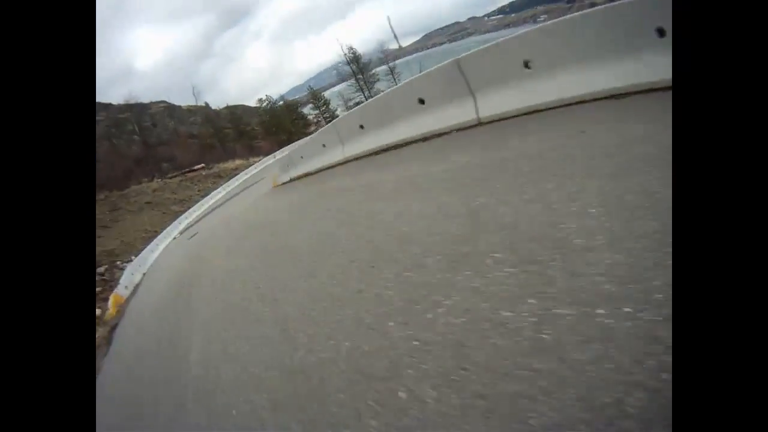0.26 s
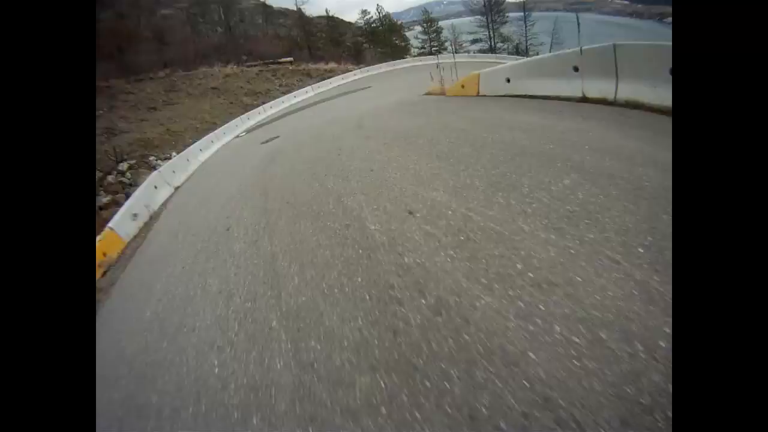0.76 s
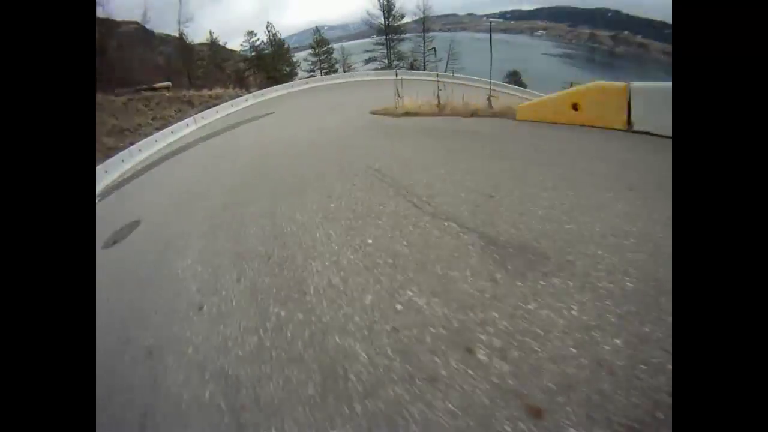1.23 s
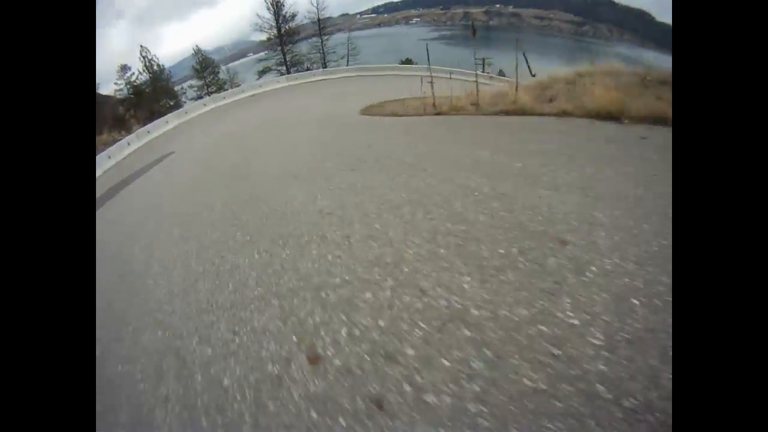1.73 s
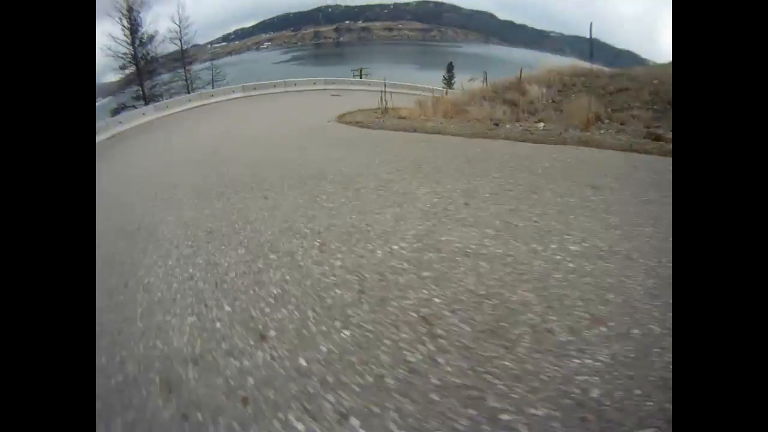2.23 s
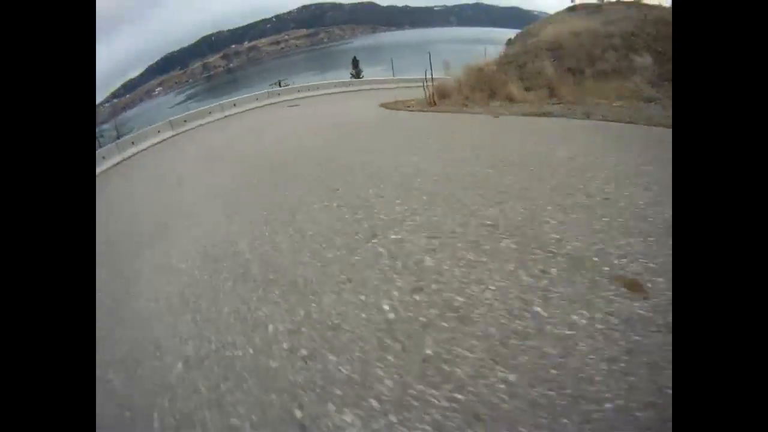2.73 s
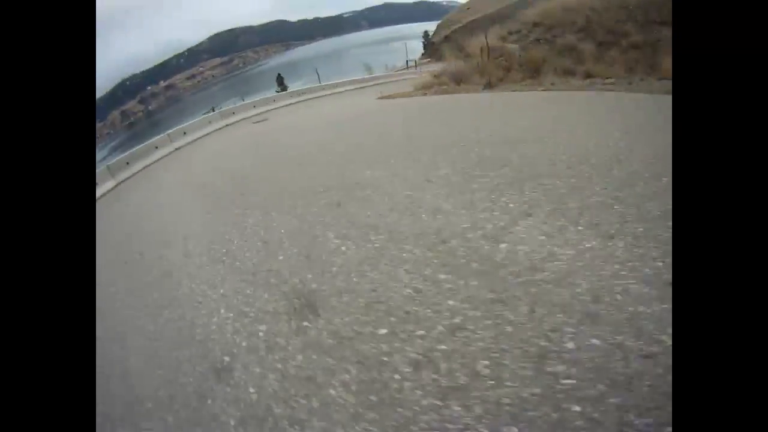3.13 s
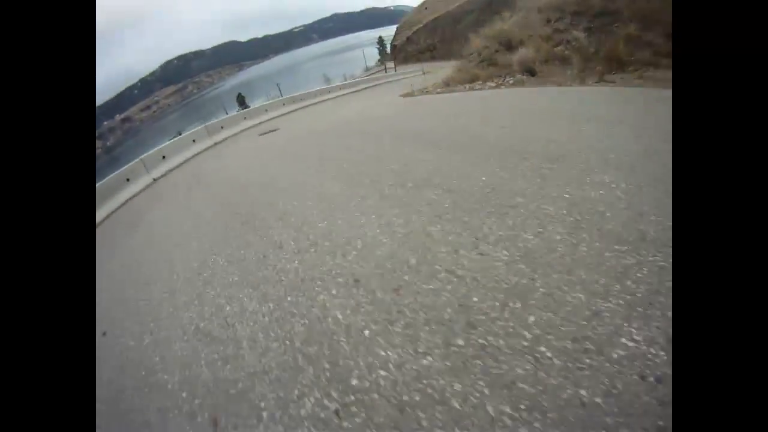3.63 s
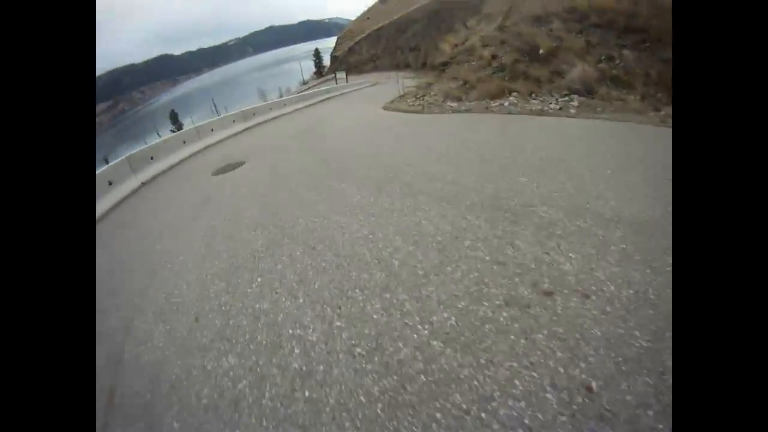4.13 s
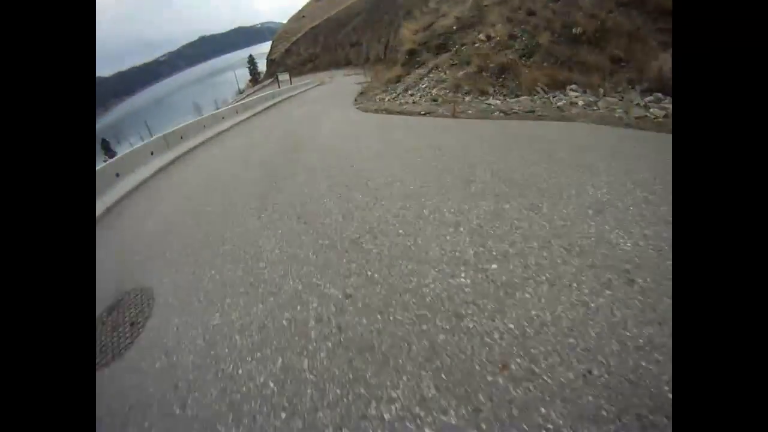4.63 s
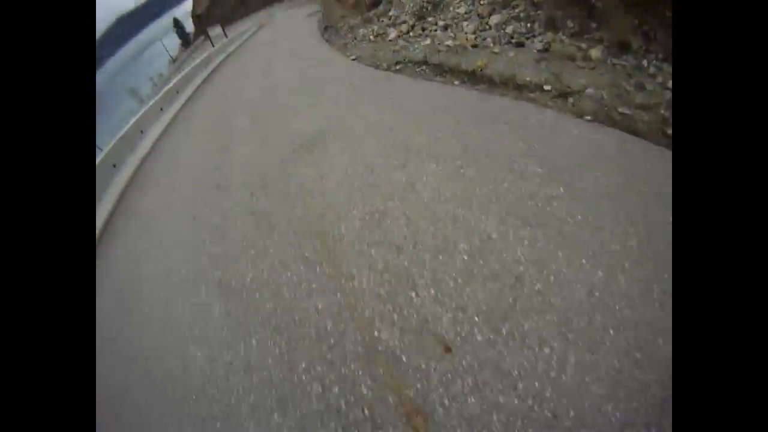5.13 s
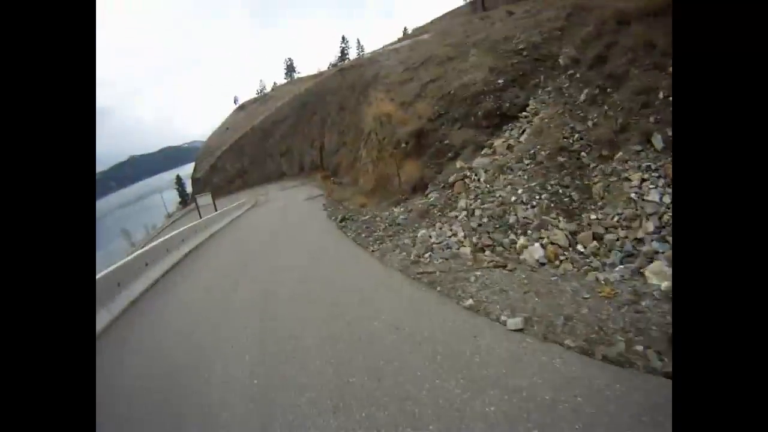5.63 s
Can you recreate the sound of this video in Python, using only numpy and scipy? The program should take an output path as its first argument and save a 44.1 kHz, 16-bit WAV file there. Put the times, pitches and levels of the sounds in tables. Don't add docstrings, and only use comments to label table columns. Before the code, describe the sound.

A loud, nasal, gritty plastic drag on rough road swells and stutters, stops, rasps again for half a second, leaving soft wheel roar and wind rumble.

```python
import sys
import numpy as np
from scipy import signal
from scipy.fft import rfft, irfft, next_fast_len
from scipy.io import wavfile
from scipy.ndimage import uniform_filter1d

SR = 44100
rng = np.random.default_rng(int(sys.argv[2]) if len(sys.argv) > 2 else 0)


def elevation(decibels):
    levels = np.asarray(decibels, float)
    return 10 ** (levels / 20)


def bounce(signal):
    frames = np.transpose(np.atleast_2d(signal))
    limited = np.clip(frames, -1, 1)
    pcm = np.round(limited * 32767).astype(np.int16)
    wavfile.write(sys.argv[1], SR, pcm)


N = 258867

# start_s, unevenness (0-1), extra_low_ring_db
CONTACT = [
    (0, 0, 2),
    (.5, 0.33, -2.5),
    (1.5, 0.71, -2),
    (2.4, 0.18, -2.5),
    (3.3, 0, -4),
    (4.0, .7, 0),
    (4.36, 0.34, 0.5),
    (4.85, 0.43, 1),
    (5.2, 1, 5.5),
    (5.3, 0.7, -4),
]


def unit(x):
    return x / np.sqrt(np.mean(x ** 2))


def columns(table):
    s, *values = np.transpose(table)
    return [np.interp(np.arange(N) / SR, s, v) for v in values]


def humps(table):
    t = np.arange(N) / SR
    return sum(db * np.exp(-(2 * (t - s) / length) ** 2) for s, db, length in table)


def band_pass(x, order, edges):
    return signal.sosfilt(signal.butter(order, edges, "band", fs=SR, output="sos"), x)


def ring(x, hz, width):
    return signal.lfilter(*signal.iirpeak(float(hz), hz / width, fs=SR), x)


def walk(rate):
    k = max(int(SR / rate), 1)
    held = np.repeat(rng.standard_normal(N // k + 1), k)
    return unit(uniform_filter1d(uniform_filter1d(held, k), k)[:N])


def colour(x, gain):
    size = next_fast_len(N + 4096)
    hz = np.arange(size // 2 + 1) * SR / size
    return irfft(rfft(x, size) * gain(hz), size)[:N]


def contact():
    # start_s, pressure_db, lean_db, bite_db
    long_drag = [(0, -31.5, -3, -0.5), (.31, -33.5, -4.5, 7.5), (.52, -30.5, -1, 0.5), (.58, -24.5, -2, -2),
                 (.74, -21, 4, 2), (1.0, -23, 3, 2.5), (1.3, -22, 3.5, 7), (1.5, -16.5, 0, -4.5),
                 (1.62, -19.5, -2, -2.5), (1.85, -21, -1, -1.5), (2.15, -20.5, -2, 3),
                 (2.5, -19.5, -1.5, -3.5), (2.62, -22.5, -2, 9.5), (3.2, -26, -1, -5),
                 (3.62, -27.5, -0.5, -6.5), (3.78, -25, 4, -1), (3.9, -28.5, 5.5, 1.5),
                 (3.99, -38.5, 4.5, -6)]
    # start_s, pressure_db, lean_db, bite_db
    short_drag = [
        (4.353, -29, 4, 10),
        (4.385, -21.5, 5.5, -8),
        (4.47, -20, 5, 0),
        (4.7, -24, 5, -0.5),
        (4.79, -24.5, 4, -6),
        (4.826, -30, 7.5, -14),
        (4.87, -46.5, -2, -9),
    ]
    # start_s, pressure_db, dullness_db
    brush = [
        (4.0, -52, -3),
        (4.2, -50.5, -6.5),
        (4.35, -43, -7),
        (4.87, -42, -8),
        (5.05, -54.5, 0),
        (5.25, -54, -7),
        (5.4, -59, -23),
        (5.87, -55.5, -1),
    ]
    # centre_s, change_db, length_s
    dips_and_swells = [(.374, 1.5, 0.097), (.499, -1.5, 0.092), (.818, -5, 0.051), (.883, -12, 0.021),
                       (.708, 5, 0.021), (1.39, -1.5, 0.035), (3.801, 2, .08), (.856, -5.5, 0.016),
                       (3.862, -0.5, .025), (1.15, 0.5, 0.099), (3.7, 1.5, .08), (.912, 4, 0.018),
                       (1.03, -7.5, 0.073), (1.197, -2.5, 0.014), (1.457, -9, 0.15), (1.791, -1.5, 0.14),
                       (1.931, -1, 0.029), (2.165, 2.5, 0.11), (2.235, -3.5, 0.033), (2.345, 1, .06),
                       (2.514, 2, 0.033), (2.569, -5, 0.032), (2.814, 5, 0.032), (2.844, -5, 0.027),
                       (3.407, -4, 0.049), (3.612, -1, 0.033), (3.946, -8.5, 0.025), (4.131, 8, 0.032),
                       (5.213, 0, .03), (5.32, 3, 0.025)]
    let_go_s = .006

    t = np.arange(N) / SR
    second = t > brush[0][0]
    down = (t < long_drag[-1][0]) | ((t > short_drag[0][0]) & (t < short_drag[-1][0]))
    down = uniform_filter1d(1. * down, size=int(let_go_s * SR) + 1)
    pressure_db, lean_db, bite_db = down * np.where(second, columns(short_drag), columns(long_drag))
    brush_db, dull_db = (1 - down) * columns(brush)
    return pressure_db + brush_db + humps(dips_and_swells), lean_db, bite_db, dull_db, 1 - down


def grit(rate, spread_db, patchy_db):
    uneven = columns(CONTACT)[0]
    hit = rng.random(N) < rate / SR
    size_db = uneven * spread_db * np.minimum(rng.exponential(size=N), 5)
    clicks = hit * elevation(size_db) * rng.standard_normal(N)
    clicks = clicks * elevation(uneven * patchy_db * walk(140))
    return clicks / np.sqrt(uniform_filter1d(clicks ** 2, size=SR // 12) + 1e-9)


def knocks(pressure_db, lean_db):
    # start_s, peak_db, pitch_hz
    stones = [(0.5611, -7, 2270), (0.6195, -8, 2150), (0.6978, -6, 2890), (0.7467, -3, 2800),
              (0.7756, -2.5, 2390), (0.8964, -3, 2800), (0.9068, -3, 2200), (0.9692, 0, 2280),
              (1.1238, -2, 2510), (1.2441, -9, 2140), (1.3204, -2.5, 2320), (1.5189, 1, 2930),
              (1.5274, 0.5, 2150), (1.5978, -3.5, 2300), (1.6162, -3.5, 2130), (1.8627, -1.5, 2240),
              (1.8891, -2, 2160), (1.9644, -0.5, 2130), (2.0542, -4, 2200), (2.135, 0, 2320),
              (2.2543, -3, 2250), (2.387, 3, 2150), (2.4164, 3.5, 2340), (2.4683, 0.5, 2200),
              (2.5107, 3, 2200), (2.8045, -5, 2300), (3.044, -4.5, 2340), (4.122, -22.5, 2040),
              (4.361, -3, 2960), (5.221, -21, 1970)]
    pebbles_per_s, pebble_db, pebble_spread_db, pebble_hz = 16, 13.5, -4.5, 2200
    puff_db, puff_spread_db, puff_per_lean = -14, 3.5, -1.15

    tick = np.arange(300) / SR
    swell = np.minimum(tick / .0005, 1) * np.exp(-(tick / .003) ** 2)
    luck = rng.standard_normal((200, 303))
    times = np.cumsum(rng.exponential(size=170)) / pebbles_per_s
    pebbles = []
    for s, chance in zip(times[times < N / SR], luck[len(stones):]):
        peak_db = pressure_db[int(s * SR)] + pebble_db + pebble_spread_db * np.tanh(chance[301])
        pebbles.append((s, peak_db, pebble_hz * (1 + 0.044 * chance[302])))

    chatter, bright = np.zeros(N + 300), np.zeros(N + 300)
    for (s, db, hz), puff in zip(list(stones) + pebbles, luck):
        at = slice(int(s * SR), int(s * SR) + 300)
        chatter[at] += elevation(db - 7.0) * swell * np.sin(2 * np.pi * hz * tick + 3 * puff[0])
        bright[at] += elevation(db + puff_db + puff_spread_db * np.tanh(puff[300])) * swell * puff[:300]
    return chatter[:N], bright[:N] * elevation(puff_per_lean * lean_db)


def shell(push, modes, edges):
    return band_pass(sum(elevation(db) * ring(push, hz, width) for hz, width, db in modes), 3, edges)


def drag():
    # centre_hz, width_hz, level_db
    low_modes = [(1200, 140, 0), (1340, 130, 5), (1575, 75, 0)]
    main_modes = [(1870, 100, -21.5), (2150, 220, 4.5), (2418, 70, -2)]
    middle_modes = [(2800, 660, 3), (2813, 173, 22)]
    edge_modes = [(3526, 610, -2.8), (3562, 130, 1)]
    upper_modes = [(3850, 405, 9), (4250, 570, -23), (4760, 330, 4.5), (5230, 180, -1)]
    # from_hz, to_hz
    passes = [(1080, 1630), (1650, 2940), (2400, 3156), (3150, 3560), (3700, 10700)]
    wander_db = 2.5

    main_db, lean_db, bite_db, dull_db, away = contact()
    middle_db = -8 + lean_db + 0.51 * dull_db + wander_db * walk(12)
    edge_db = -10.5 + bite_db + dull_db + wander_db * walk(10)
    upper_db = -12.5 - 1.13 * lean_db + 0.84 * dull_db + 4 * away + 1.15 * wander_db * walk(14)
    low_db = -14 - 0.39 * (main_db + 19) + columns(CONTACT)[1] - 2 * away

    shared = grit(rate=1800, spread_db=2.8, patchy_db=3.6)
    out, bright = knocks(main_db, lean_db)
    lifted = 1 / (1 + 11.0 * uniform_filter1d(np.abs(out), size=200))
    # modes, level dB, share of own grain, puff level dB
    groups = ((low_modes, low_db, .8, -15),
              (main_modes, -1.5, .3, -15),
              (middle_modes, middle_db + 0.21, .6, -8),
              (edge_modes, edge_db + 0.84, .9, 2.5),
              (upper_modes, upper_db + 0.38, .7, -3))
    for (modes, db, own, puff_db), edges in zip(groups, passes):
        push = shared + own * grit(rate=1500, spread_db=-1.0, patchy_db=4.0)
        scale = np.sqrt(np.mean(shell(push, modes, edges) ** 2))
        force = push * lifted * elevation(main_db + db) / scale
        out = out + shell(force + bright * elevation(puff_db), modes, edges)
    return out


def wind():
    # start_s, level_db
    head_wind = [(0, -33), (.22, -36.5), (.35, -43.5), (.9, -42.5), (1.2, -49.5), (2.0, -47.5),
                 (2.6, -56.5), (2.9, -54), (3.2, -66), (3.52, -51), (4.0, -67), (4.5, -59), (4.75, -62),
                 (4.9, -50.5), (5.15, -56.5), (5.4, -49), (5.6, -54), (5.87, -49.5)]
    # centre_s, over_calm_db, length_s
    gusts = [(0, 13, 0.15), (.23, 15, 0.1), (.42, 12, 0.19), (.66, 8.5, 0.13), (1.0, 5, 0.08),
             (1.67, 11, 0.11), (2.3, 10.5, 0.19), (2.52, 5.5, 0.11), (2.73, 8.5, 0.1), (3.06, 3.5, 0.38),
             (3.18, 5, .07), (3.51, 5, .12), (4.0, 3, 0.12), (4.4, 5.5, 0.29), (5.05, 9, 0.14),
             (5.2, 4, 0.074), (5.37, 3, .1), (5.75, -4.5, .4), (4.7, 5, 0.45), (2.1, 6, 0.23)]
    calm_db, calm_fall_db_per_s = -44, .5

    gust_db = humps(gusts)
    buffet_db = calm_db - calm_fall_db_per_s * np.arange(N) / SR + gust_db
    flutter_db = columns(head_wind)[0] + 0.2 * gust_db + 1.7 * walk(10)

    buffet = unit(ring(ring(ring(rng.standard_normal(N), 36.3, 10.3), 33.2, 19.4), 31.3, 27.0))
    buffet = unit(buffet / np.sqrt(0.59 + uniform_filter1d(buffet ** 2, size=2500)))

    flutter = ring(rng.standard_normal(N), 89, 20) + .25 * ring(rng.standard_normal(N), 160, 90)
    flutter = band_pass(unit(flutter), 2, [60, 260])
    return buffet * elevation(buffet_db) + flutter * elevation(flutter_db - 2 + 1.1 * walk(23))


def wheels():
    # start_s, roar_db, deck_db
    load = [(0, -40.5, 4.5), (.3, -43.5, 0), (.7, -47, -1.5), (1.3, -44, -0.5), (2.2, -39.5, -2),
            (2.7, -44.5, 0), (3.1, -47, -0.5), (4.1, -47.5, 2), (4.9, -45, -1.5), (5.2, -43, -1.5),
            (5.35, -45.5, -7), (5.87, -43.5, -4.5)]
    # frequency_hz, density_db (dB per Hz)
    spectrum = [(76, -39), (130, -10), (283, -1), (348, -4.5), (471, 2.5), (579, 3.5), (712, -2),
                (904, -16), (1410, -7.5), (1650, -14), (1880, -1), (2310, -10), (5800, -58), (7540, -78),
                (12800, -120)]
    # centre_hz, width_hz, level_db
    deck = [(301, 65, -7), (746, 20, -2), (927, 56, 21), (1240, 33, 17.5), (1970, 77, 6)]

    load_db, deck_db = columns(load)
    roar_db = load_db + 0.76 * walk(11)
    hz, db = np.transpose(spectrum)
    rough = rng.standard_normal(N) * elevation(0.21 * walk(25.12))
    roar = colour(rough, lambda f: elevation(np.interp(np.log(f + 1), np.log(hz), db)))
    roar = roar + sum(elevation(g + deck_db + 2.5 * walk(5.5)) * ring(roar, f, w) for f, w, g in deck)
    return unit(roar) * elevation(roar_db - 1.0)


def ticks():
    # start_s, peak_db
    thrown = [
        (0.561, -29),
        (1.1193, -23),
        (1.3253, -23),
        (1.5178, -24),
        (2.1264, -21),
        (2.5116, -26),
        (3.487, -20),
        (3.5428, -24),
    ]
    out = np.zeros(N + 100)
    sparks = rng.standard_normal((len(thrown), 100)) * np.hanning(100)
    for (s, db), spark in zip(thrown, sparks):
        out[int(s * SR):int(s * SR) + 100] += elevation(db + 8.5) * unit(spark)
    return band_pass(out[:N], 2, [4100, 5600])


def bumps():
    # start_s, peak_db, pitch_hz
    blows = [
        (2.7392, -21, 86),
        (2.768, -33, 61.9),
        (2.819, -34.5, 89),
        (4.888, -42, 90),
        (5.365, -31.5, 68.8),
    ]
    out, tick = np.zeros(N + 3000), np.arange(3000) / SR
    for s, db, hz in blows:
        cycle = np.sin(2 * np.pi * hz * tick) + 0.33 * np.sin(2 * np.pi * 2.44 * hz * tick)
        out[int(s * SR):int(s * SR) + 3000] -= elevation(db) * cycle * np.exp(-tick / 0.013)
    return out[:N]


def scene():
    # centre_hz, width_hz
    gaps = [(1480, 104), (1650, 60), (3230, 175), (3760, 110)]
    air_hz = [1080, 2580]

    hiss = elevation(-59.5) * rng.standard_normal(N)
    out = drag() + wind() + wheels() + ticks() + bumps() + hiss
    for hz, width in gaps:
        out = out - .68 * ring(out, hz, width)
    air = unit(band_pass(rng.standard_normal(N), 2, air_hz))
    return (out + air * elevation(-58 + 2.0 * walk(9.3)))[None]


def coarse_bands(x):
    # from_hz, to_hz, frame_level_db, scatter_db, sign (1 = when louder, -1 = when softer)
    drops = [(11400, 12300, -27.5, 2, 1), (12300, 12900, -23, 4, 1), (15300, 22000, -19.5, 2, -1)]

    loudness = np.sqrt(uniform_filter1d(x ** 2, size=1024) + 1e-12)
    for edges, db in (([10300, 11300], -25), ([5500, 6500], -40), ([12300, 13000], -40)):
        x = x + elevation(db) * loudness * band_pass(rng.standard_normal(N), 4, edges)

    frame_db = 20 * np.log10(loudness[512::1024])
    chance = 1.9 * uniform_filter1d(rng.standard_normal((len(drops), len(frame_db))), size=2)
    for (low, high, above_db, scatter_db, sign), luck in zip(drops, chance):
        dropped = sign * (frame_db + scatter_db * luck - above_db) > 0
        gate = np.resize(np.repeat(1. * dropped, 1024), N)
        gate = uniform_filter1d(uniform_filter1d(gate, size=256), size=256)
        x = x - gate * colour(x, lambda f: (f > low) & (f < high))
    return x


def roll_off(x):
    return signal.sosfilt(signal.butter(12, 16400, fs=SR, output="sos"), x)


def record(dry):
    sample_hz, top_hz = 12000, 15300
    low = signal.sosfilt(signal.butter(8, 5450, fs=SR, output="sos"), dry[0]) + elevation(-36.5) * dry[0]
    low = colour(np.tanh(0.72 * low) / 0.68, lambda f: f < sample_hz / 2)
    mirrored = low * (1 + 2 * np.cos(2 * np.pi * sample_hz * np.arange(N) / SR))
    held = colour(mirrored, lambda f: np.sinc(f / sample_hz) / np.sqrt(1 + (f / 17000) ** 4))
    held = colour(held, lambda f: np.where(f < top_hz, 1, elevation(-20 - .03 * (f - top_hz))))
    return roll_off(coarse_bands(held)[None])


dry = scene()
out = record(dry)
bounce(out)
```